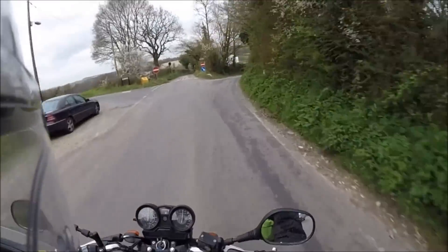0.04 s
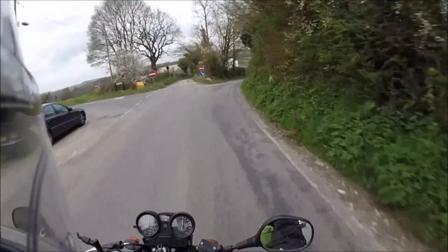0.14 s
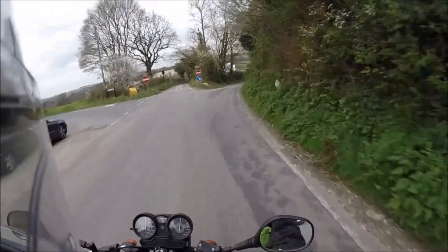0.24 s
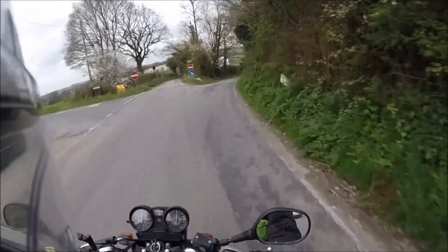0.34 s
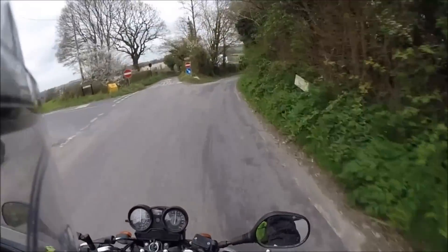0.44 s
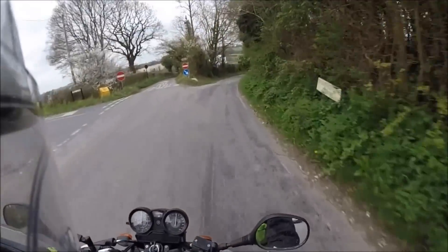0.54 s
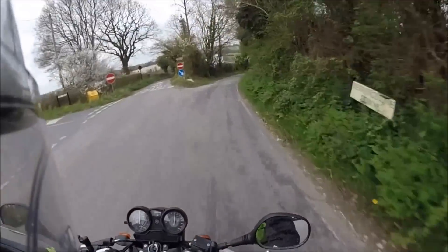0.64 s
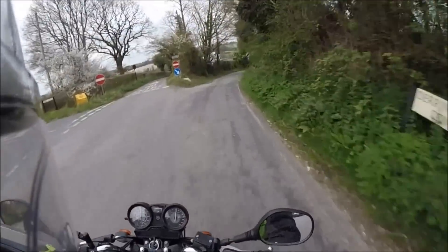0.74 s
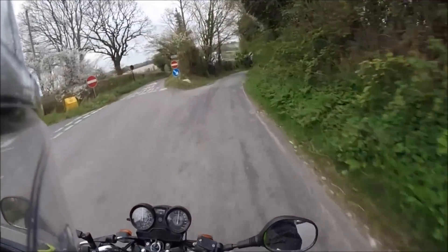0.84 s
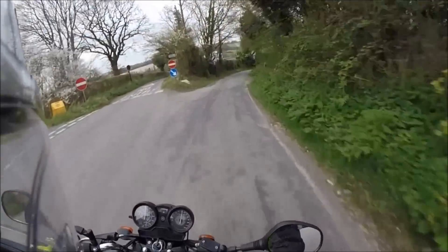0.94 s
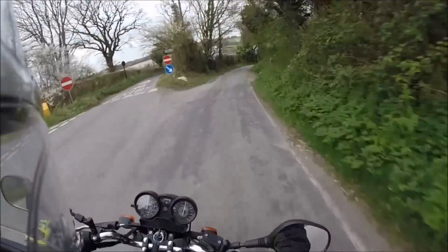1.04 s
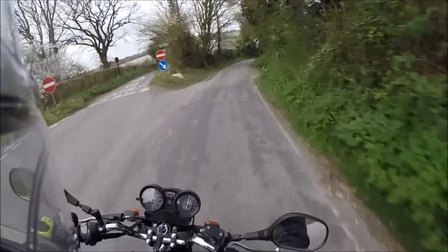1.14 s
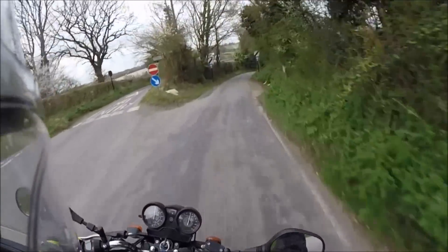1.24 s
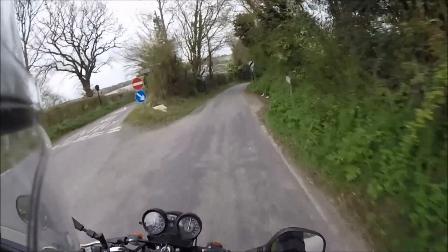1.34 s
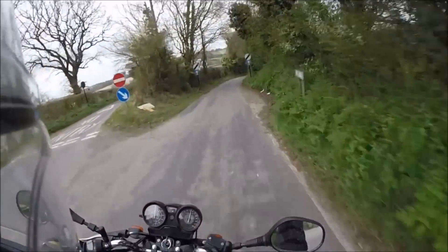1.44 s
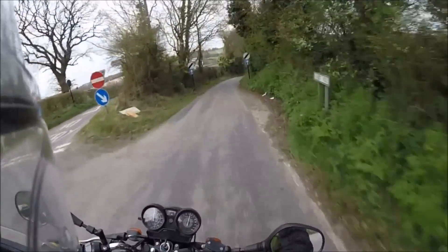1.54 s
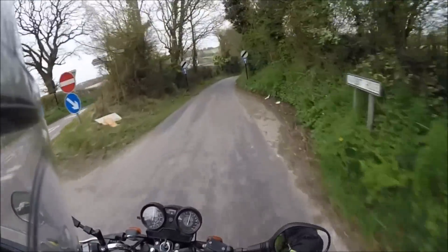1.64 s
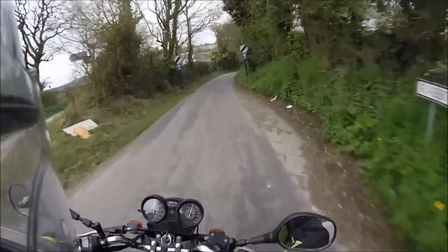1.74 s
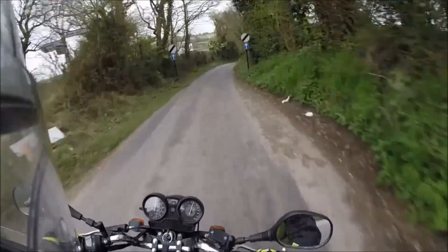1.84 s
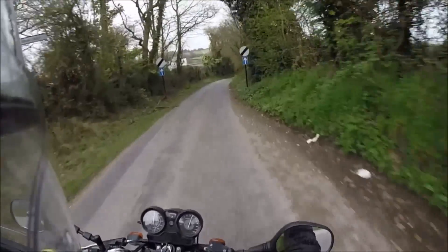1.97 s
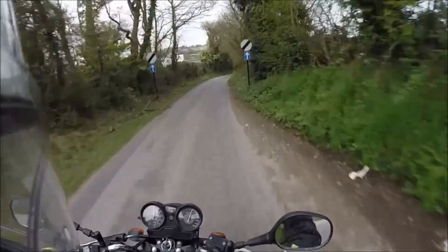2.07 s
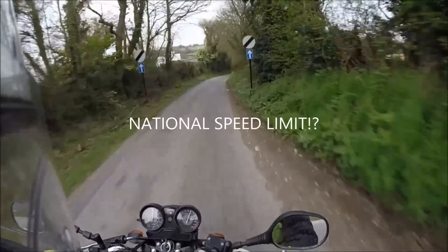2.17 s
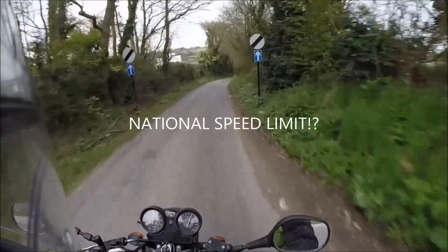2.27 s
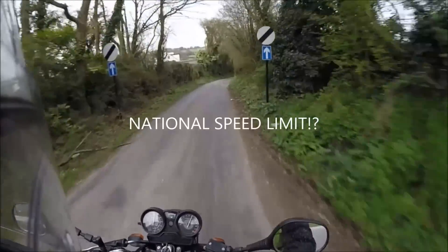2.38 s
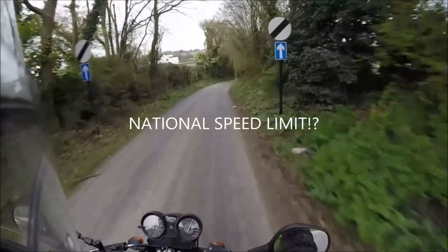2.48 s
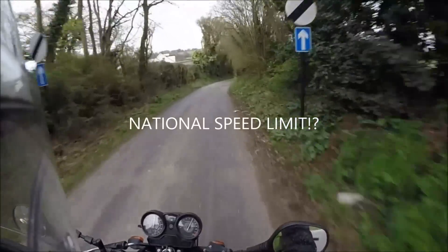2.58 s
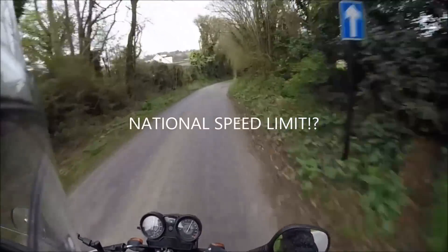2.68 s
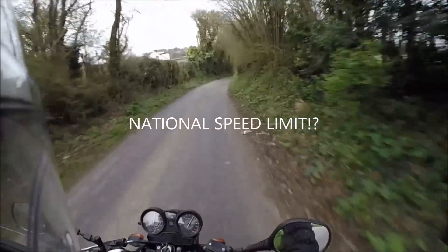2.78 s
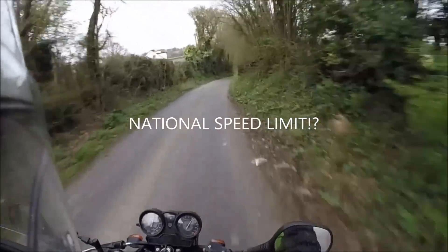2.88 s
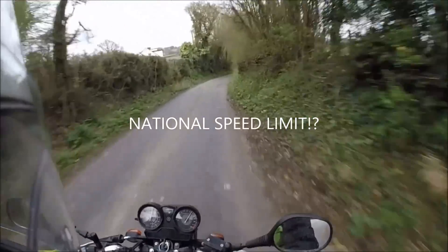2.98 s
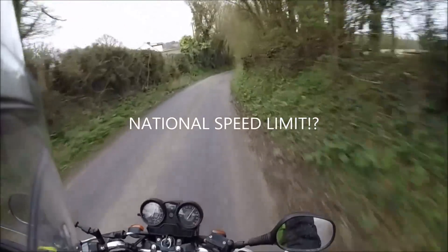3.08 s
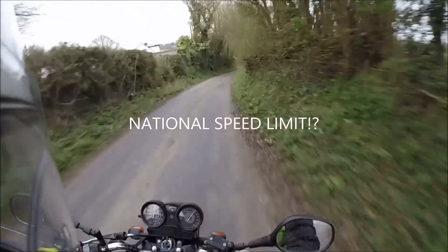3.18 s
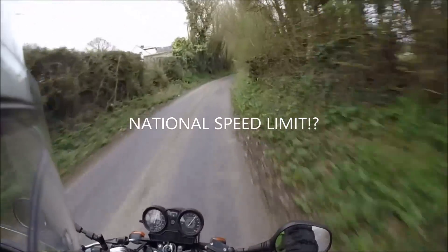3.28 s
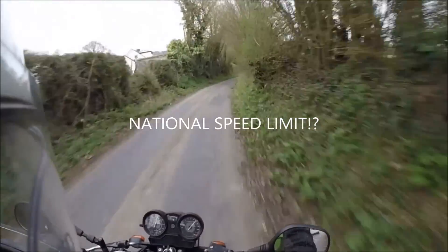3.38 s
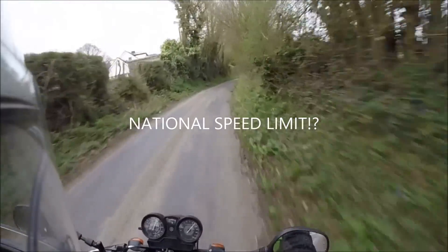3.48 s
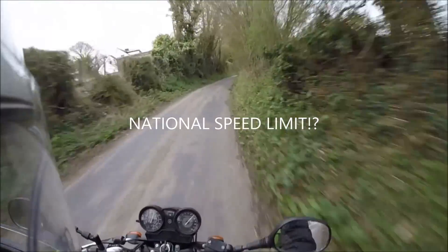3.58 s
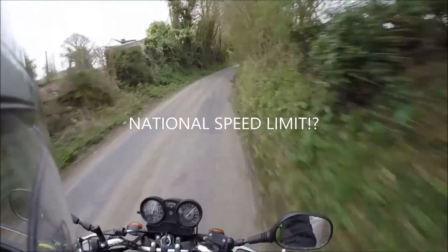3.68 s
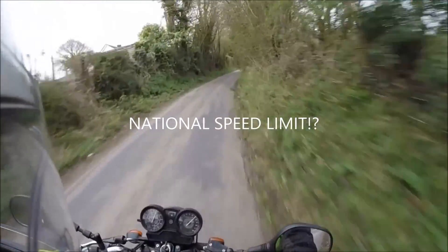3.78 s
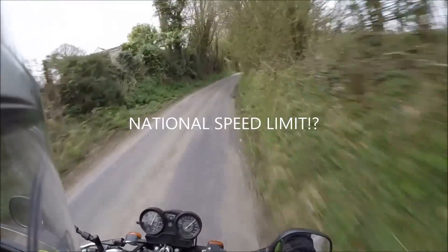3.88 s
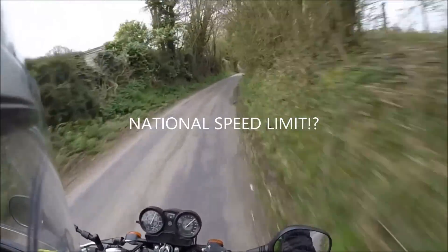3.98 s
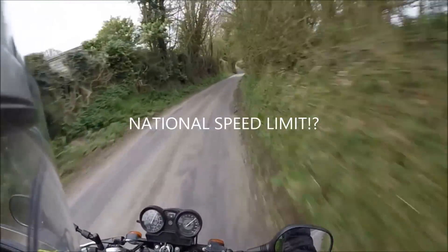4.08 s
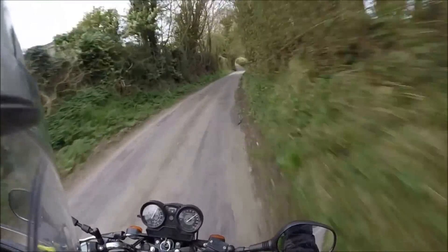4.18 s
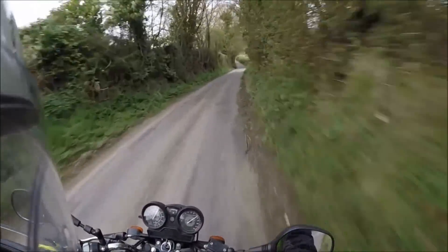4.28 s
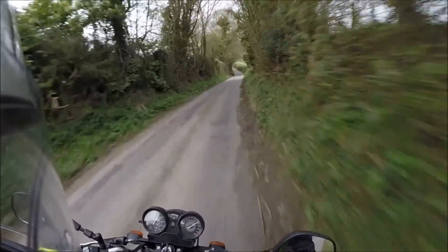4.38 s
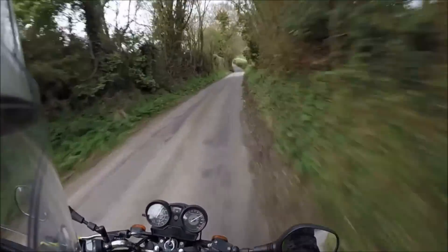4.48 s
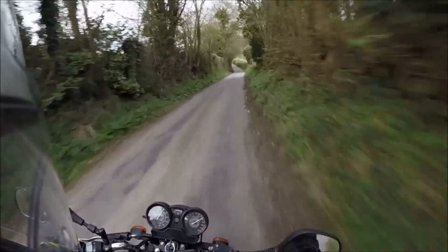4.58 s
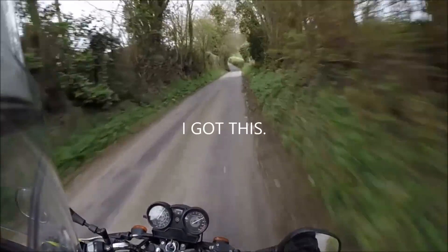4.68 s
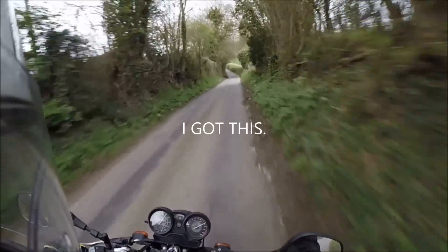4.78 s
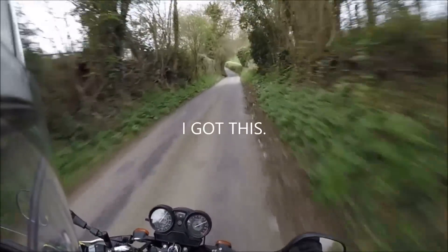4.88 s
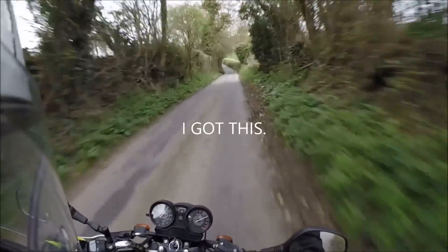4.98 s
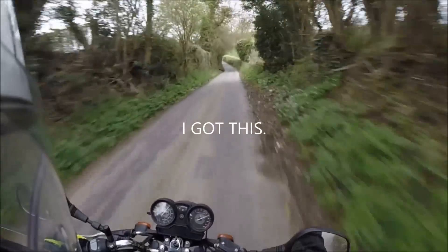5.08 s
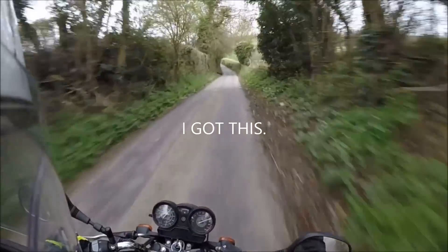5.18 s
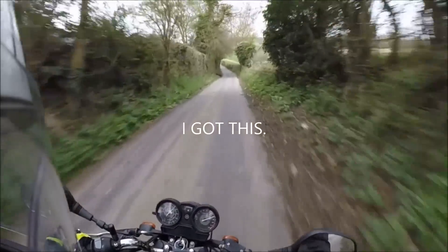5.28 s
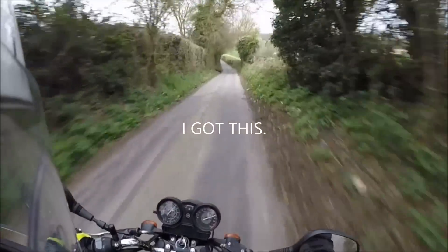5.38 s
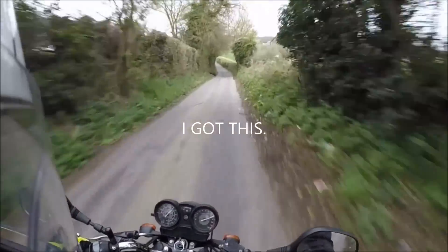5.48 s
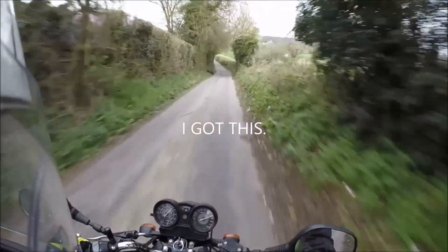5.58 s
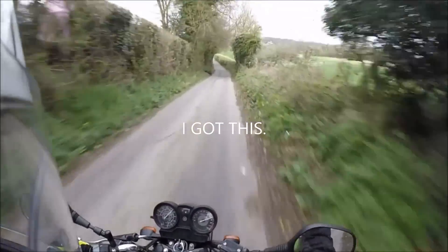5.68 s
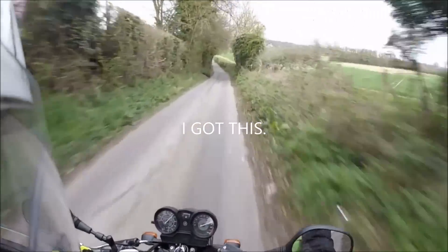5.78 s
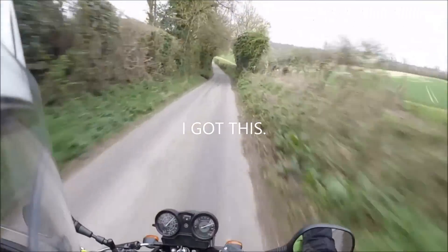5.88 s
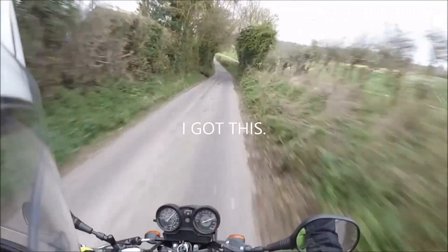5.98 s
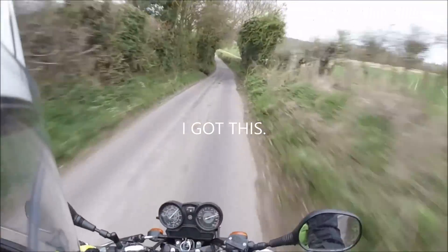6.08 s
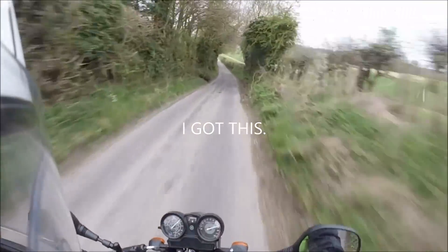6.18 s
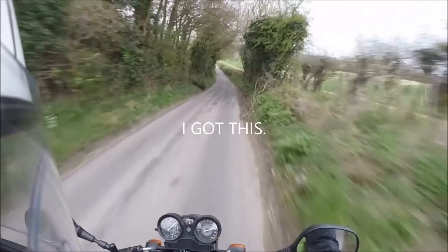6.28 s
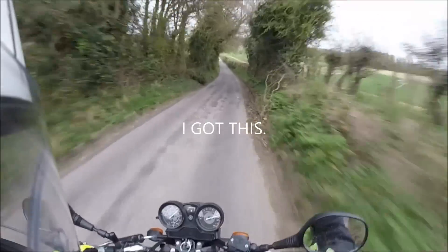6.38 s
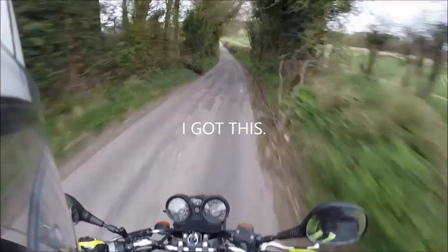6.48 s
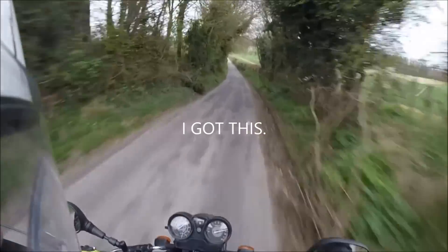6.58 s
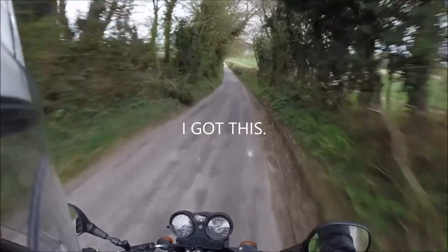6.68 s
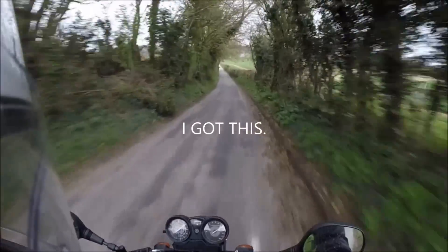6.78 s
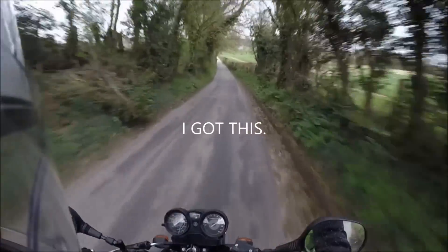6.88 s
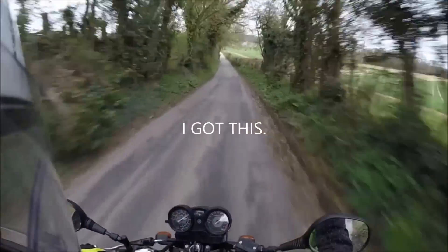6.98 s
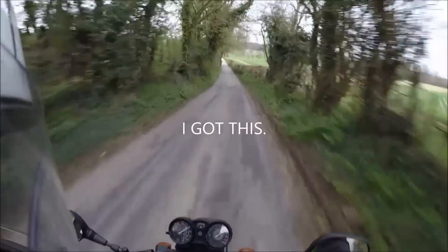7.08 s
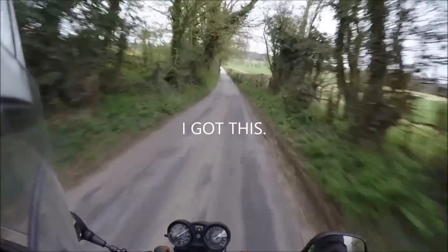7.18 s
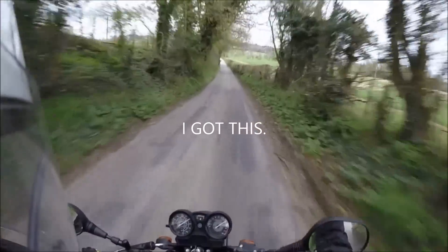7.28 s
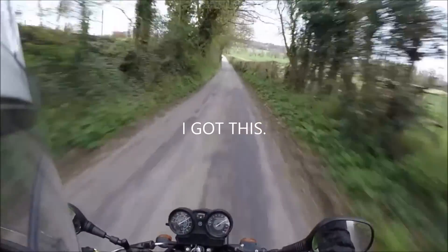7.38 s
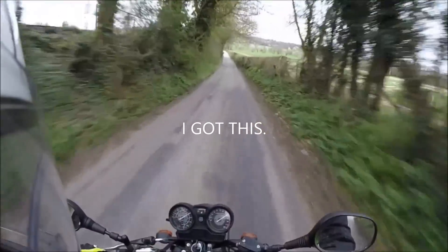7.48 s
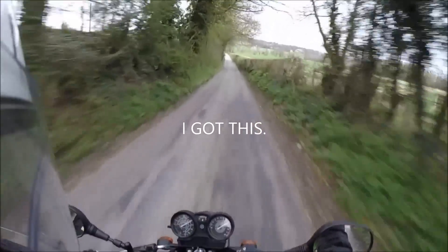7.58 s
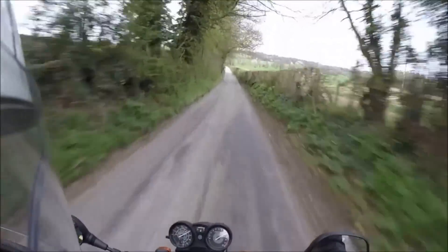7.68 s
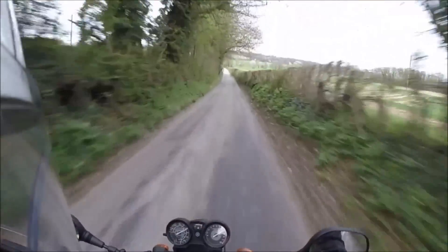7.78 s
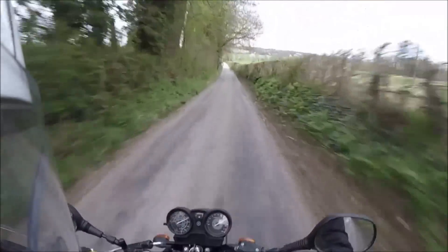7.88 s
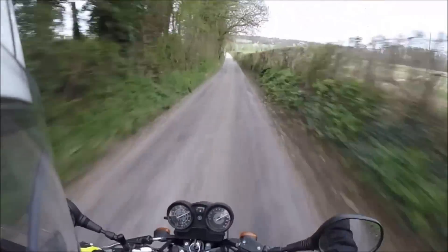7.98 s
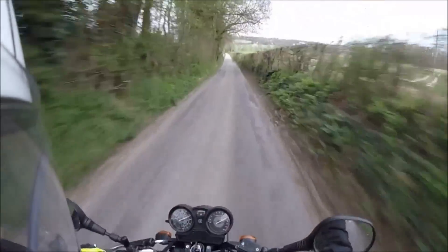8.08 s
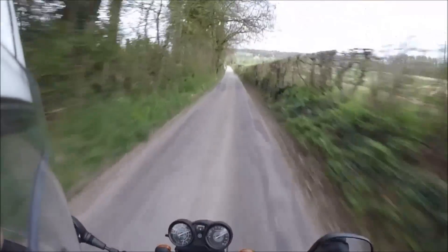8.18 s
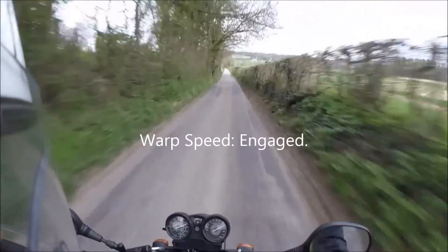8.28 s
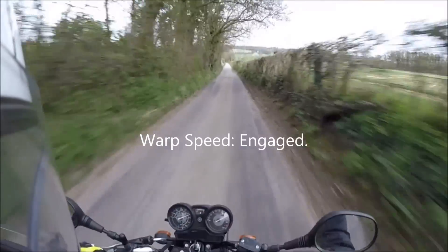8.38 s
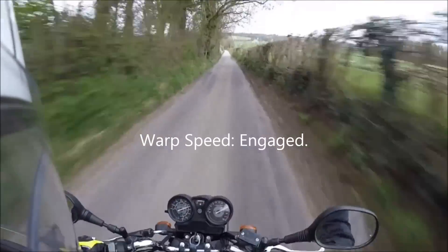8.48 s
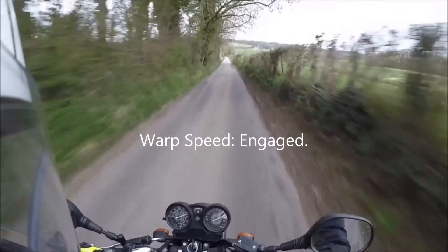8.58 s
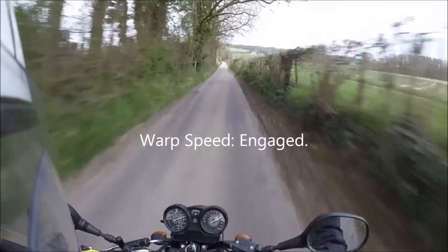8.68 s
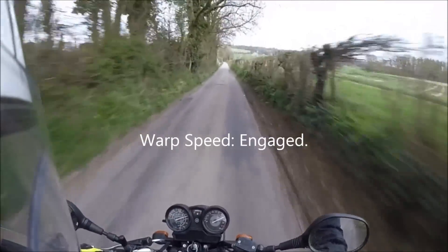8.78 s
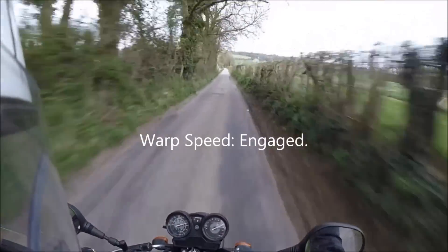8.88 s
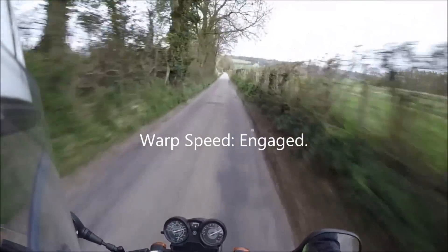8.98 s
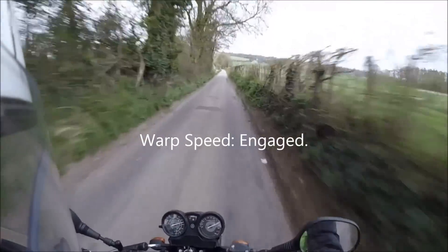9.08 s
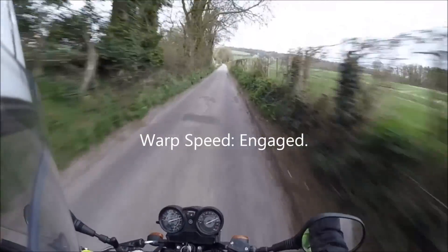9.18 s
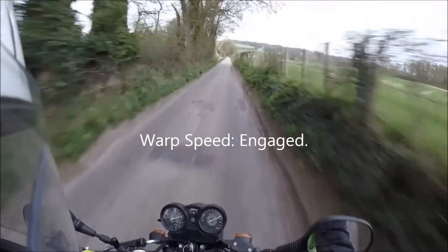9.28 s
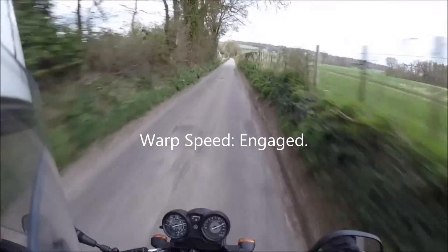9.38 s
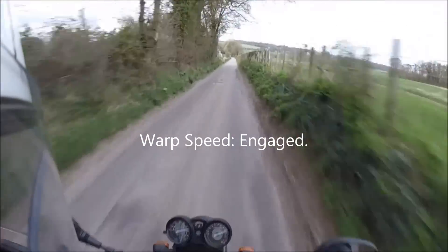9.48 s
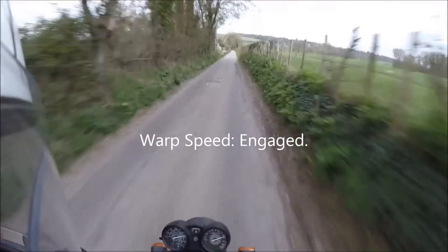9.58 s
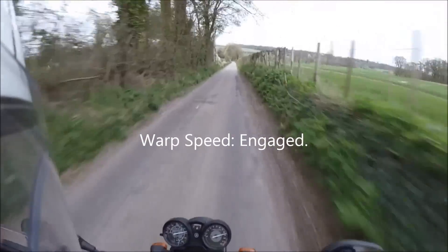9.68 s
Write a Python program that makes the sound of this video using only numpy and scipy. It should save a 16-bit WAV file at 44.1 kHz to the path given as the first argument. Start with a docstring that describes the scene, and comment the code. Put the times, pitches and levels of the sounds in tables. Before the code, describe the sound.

A helmet microphone on a motorcycle gathering speed along a country lane. Wind starts low, swells over the first two seconds, then holds as a dense, hollow midrange rush with low rumble and booming. A faint single-cylinder engine drones beneath, climbing smoothly in one gear. A tiny thin whistle passes, and later gusts add brighter hiss and heavier buffeting.

```python
"""A country lane, heard from a camera microphone on the helmet of a rider gathering speed on a single-cylinder motorcycle.
The airstream is shaped noise: it rings the cavities of the camera housing, rumbles and booms close around the helmet
and hisses over the edges, brighter as the speed rises. Gusts change the spray, rumble and boom; one thin whistle passes.
The engine, faint under the wind, is a stack of harmonics climbing slowly in one gear."""
import sys
import numpy as np
from scipy import signal
from scipy.fft import rfft, irfft, next_fast_len
from scipy.io import wavfile
from scipy.ndimage import uniform_filter1d

SR = 44100
rng = np.random.default_rng(int(sys.argv[2]) if len(sys.argv) > 2 else 0)


def materialize(psi):
    """Save the field psi as 16-bit PCM at rate SR to the path in sys.argv[1].

    A 1-D psi becomes a single channel; in a 2-D psi each row is a channel.
    """
    bounded = np.clip(np.atleast_2d(psi).T, -1, 1)
    quanta = np.round(bounded * 32767).astype(np.int16)
    wavfile.write(sys.argv[1], SR, quanta)


N = 429534
TIME = np.arange(N) / SR   # seconds
FREQS = np.maximum(np.arange(N // 2 + 1) * SR / N, 1)   # Hz

# Strength of the airstream at the helmet, before its sway. Each row: time in seconds, level in dB.
AIRSTREAM = [(0.0, -39), (0.05, -43.5), (0.43, -32.5), (0.84, -30), (1.0, -25), (1.16, -27), (1.54, -24.5),
             (2.06, -24), (2.25, -21), (5.07, -21), (5.24, -22), (6.78, -21), (7.24, -22), (7.35, -20.5),
             (8.24, -21.5), (8.71, -19.5), (9.0, -21), (9.74, -21)]
# Engine speed, and with it road speed. Each row: time in seconds, firings per second.
FIRING_RATE = [(0, 37), (1.2, 44), (1.7, 46.2), (2.3, 49.3), (2.7, 52.7), (3.1, 54.9), (3.5, 57.2),
               (4.0, 60.4), (4.5, 63), (5.0, 65.3), (5.8, 68.1), (6.4, 71.6), (8.0, 78.8), (9.74, 85)]
# Level of the exhaust note before its colour and roughness. Each row: time in seconds, level in dB.
EXHAUST_LEVEL = [(0, -78), (1.3, -58), (2.4, -45.5), (4.3, -45), (6.0, -48.5), (9.74, -49.5)]
# Gusts. Each row: centre in seconds, length in seconds, then the lift of spray, buffet and boom in dB.
GUSTS = [(0.55, 0.13, 0, 0, 11), (1.002, 0.62, -3, 1.5, 3), (2.15, .35, 0, -1, 5),
         (2.79, 0.14, 0.5, -0.5, 10), (4.554, .3, 1.5, 0, 3.5), (5.103, 0.58, -1.5, 0.5, 1),
         (5.953, .2, 1.5, 4, 8.5), (6.818, .2, 5, 2.5, -4), (7.215, 0.23, 5.5, 2, 6),
         (7.82, 0.31, 5.5, 3.5, 0), (8.303, 0.12, 4, 5.5, 2), (8.87, .14, 2, 0.5, 6),
         (9.105, 0.18, 5, 3, 11.5)]
# Short thin whistle. One row: centre in seconds, length in seconds, pitch in Hz, width in Hz.
WHISTLE = (3.56, .12, 6700, 300)

# Cavities of the camera housing. Each row: centre in Hz, half-power width in Hz, relative level in dB.
CAVITIES = [(1541, 194, -5.5), (1766, 186, 0.5), (1910, 71, -6), (2296, 190, -7.5), (2661, 189, -4.5),
            (2928, 120, -8), (3180, 157, -9), (3480, 220, -9), (3786, 180, -16.5)]
# Resonances of the edges. Each row: centre in Hz, half-power width in Hz, relative level in dB.
EDGE_MODES = [(4280, 530, 0.5), (5180, 650, -2), (5760, 540, -1), (6650, 440, -4.5), (7210, 440, -4.5)]
# The sharpest edge, which sings. Each row: centre in Hz, half-power width in Hz, relative level in dB.
EDGE_TONE = [(5446, 150, 0)]
# Fine spray of air above the hiss. Each row: centre in Hz, half-power width in Hz, relative level in dB.
SPRAY_MODES = [(7700, 1600, 0), (9060, 1200, -0.5), (10280, 630, 1.5), (11600, 600, -5.5), (12600, 540, -7),
               (13400, 600, -9), (14700, 1300, -16)]
# Colour of the soft middle of the wind. Each row: frequency in Hz, relative level in dB.
BREEZE_COLOUR = [(200, -40), (430, -4.5), (600, -1), (760, -2.5), (1050, 1), (1300, 0.5), (2000, -29),
                 (4000, -70)]
# Colour of the rumble on the helmet shell. Each row: frequency in Hz, relative level in dB.
BUFFET_COLOUR = [(8, -19), (27, 2.5), (40, 0.5), (66, -7), (105, -6.5), (175, 0), (250, -7.5), (335, -6.5),
                 (420, -15), (600, -17.5), (1300, -33), (3000, -80)]
# Exhaust resonance. Each row: frequency in Hz, gain in dB of a harmonic passing there.
EXHAUST_COLOUR = [(35, -12), (120, -12), (185, -7), (250, -15), (285, -11), (310, -3), (335, 0), (368, 0),
                  (388, -7), (410, -17), (470, -15), (520, -10), (560, -17), (620, -14), (1200, -24)]

CRUISE_FIRING_HZ, CRUISE_DB = 72, -21   # reference road speed and airstream level
HISS_GROWTH, SPRAY_GROWTH = 0.52, 1.2   # dB gained over the rush for each dB of road speed
HISS_FLUTTER_DB, SPRAY_FLUTTER_DB = 0.6, 1.2   # quick unevenness of the air over the edges
BOOM_HZ, BOOM_WIDTH_HZ = 51, 5.2
HUM_HZ, HUM_WIDTH_HZ, HUM_DB = 94, 22, -46   # low resonance of the bike
FULL_HARMONICS, HARMONIC_LOSS_DB = 7, 2.4   # harmonics above this one fade, by so many dB each
WHISTLE_DB = -46.5
CUTOFF_HZ = 15200


def from_db(db):
    """Decibels to gain."""
    return 10 ** (np.asarray(db) / 20)


def rms_one(x):
    """Scale to unit power."""
    return x / np.sqrt(np.mean(x ** 2) + 1e-20)


def in_time(rows):
    """The value of a two-column curve, sample by sample."""
    seconds, values = np.transpose(rows)
    return np.interp(TIME, seconds, values)


def bell(centre, length):
    """A smooth swell of height 1 around a moment, in seconds."""
    return np.exp(-(2 * (TIME - centre) / length) ** 2)


def colour(points, hz):
    """Gain at the given frequencies, drawn straight in dB over log frequency."""
    at, db = np.transpose(points)
    return from_db(np.interp(np.log(hz), np.log(at), db))


def resonances(modes):
    """Gain of steep-sided resonances whose powers add."""
    power = 0
    for hz, width, db in modes:
        detune = (FREQS / hz - hz / FREQS) * hz / width
        # half power where detune is 1
        power = power + from_db(db) ** 2 / (1 + (np.sqrt(2) - 1) * detune ** 2) ** 2
    return np.sqrt(power)


def noise(gain):
    """Turbulence of unit power with the given relative gain at each frequency."""
    size = next_fast_len(N, real=True)
    shape = np.interp(np.arange(size // 2 + 1) * SR / size, FREQS, gain)
    spectrum = rfft(rng.standard_normal(size)) * shape
    return rms_one(irfft(spectrum, size)[:N])


def eddies(rate_hz):
    """Random swings of spread 1, up to about the given rate."""
    return noise(1 / (1 + (FREQS / rate_hz) ** 2))


def housing_rush(air_db, flutter_db=0.58, trim_db=0.05, wall_hz=4100):
    """The airstream keeps the cavities ringing; each passing eddy changes how hard it pushes them."""
    wall = 1 / np.sqrt(1 + (FREQS / wall_hz) ** 20)   # the housing wall holds back the treble
    level_db = air_db + trim_db + flutter_db * eddies(rate_hz=97)
    return from_db(level_db) * noise(resonances(CAVITIES) * wall)


def edge_hiss(air_db, speed_db, gust_db, hiss_db=-22.5, spray_db=-34.0, tone_db=-26.0, hiss_gust_share=0.41):
    """Air tears off the edges and one sings; hiss and finer spray outgrow the rush with speed and follow gusts."""
    edge_db = air_db + HISS_GROWTH * speed_db + hiss_gust_share * gust_db
    flutter = eddies(rate_hz=27)
    hiss = from_db(edge_db + hiss_db + HISS_FLUTTER_DB * flutter) * noise(resonances(EDGE_MODES))
    tone = from_db(edge_db + tone_db) * noise(resonances(EDGE_TONE))
    fine_db = air_db + SPRAY_GROWTH * speed_db + gust_db + spray_db + SPRAY_FLUTTER_DB * flutter
    spray = from_db(fine_db) * noise(resonances(SPRAY_MODES))
    return hiss + tone + spray


def following(air_db, follow):
    """Airstream level whose distance in dB from cruise is scaled by follow."""
    return CRUISE_DB + follow * (air_db - CRUISE_DB)


def breeze(air_db, speed_db, breeze_db=-22.5, follow=0.89, growth=0.12, flutter_db=1.9):
    """The soft middle of the airstream, between rumble and cavities, fills in as speed rises."""
    level_db = following(air_db, follow) + growth * speed_db + breeze_db
    return from_db(level_db + flutter_db * eddies(rate_hz=25)) * noise(colour(BREEZE_COLOUR, FREQS))


def helmet_buffet(air_db, gust_db, buffet_db=-17, follow=0.95, lumpy_db=1.5):
    """Large eddies rumble unevenly on the shell."""
    level_db = following(air_db, follow) + buffet_db + gust_db
    return from_db(level_db + lumpy_db * eddies(rate_hz=18)) * noise(colour(BUFFET_COLOUR, FREQS))


def helmet_boom(air_db, gust_db, boom_db=-23.5, follow=0.73, steadiness=0.82):
    """The air around the helmet booms at one low pitch; partly self-sustained, it swells less than free noise."""
    boom = noise(resonances([(BOOM_HZ, BOOM_WIDTH_HZ, 0)]))
    swell = np.sqrt(np.abs(uniform_filter1d(boom ** 2, size=SR // 10)) + 1e-6)   # over 0.1 s
    steadied = rms_one(boom / swell ** steadiness)
    return from_db(following(air_db, follow) + boom_db + gust_db) * steadied


def gusts():
    """Each gust swells and passes smoothly; returns the summed lift in dB of spray, buffet and boom."""
    return sum(np.outer(lifts_db, bell(centre, length)) for centre, length, *lifts_db in GUSTS)


def engine(firing_hz, wobble=0.0016, rough_db=2.5, count=14):
    """Harmonics of the firing rate climb through the exhaust resonance; the second also hums in the bike."""
    uneven_hz = firing_hz * (1 + wobble * eddies(rate_hz=4.8))
    phase = 2 * np.pi * np.cumsum(uneven_hz) / SR
    exhaust = 0
    for k in range(1, count + 1):
        loss_db = HARMONIC_LOSS_DB * max(k - FULL_HARMONICS, 0)
        gain = colour(EXHAUST_COLOUR, k * firing_hz) * from_db(-loss_db)
        exhaust = exhaust + gain * np.sin(k * phase + rng.uniform(0, 2 * np.pi))
    level_db = in_time(EXHAUST_LEVEL) + rough_db * eddies(rate_hz=6.5)
    hum_gain = from_db(HUM_DB) * np.exp(-(2 * (2 * firing_hz - HUM_HZ) / HUM_WIDTH_HZ) ** 2)
    hum = hum_gain * np.sin(2 * phase)
    return np.sqrt(2) * (from_db(level_db) * exhaust + hum)   # root 2 gives a sine unit power


def whistle():
    """A narrow band of noise comes and goes in a moment as a thin whistle."""
    centre, length, hz, width = WHISTLE
    return from_db(WHISTLE_DB) * bell(centre, length) * noise(resonances([(hz, width, 0)]))


def scene(sway_db=0.7):
    """One swaying airstream on housing and helmet, over the engine."""
    air_db = in_time(AIRSTREAM) + sway_db * eddies(rate_hz=4)
    firing_hz = in_time(FIRING_RATE)
    speed_db = 20 * np.log10(firing_hz / CRUISE_FIRING_HZ)
    spray_db, buffet_db, boom_db = gusts()
    housing = housing_rush(air_db) + edge_hiss(air_db, speed_db, spray_db) + whistle()
    helmet = breeze(air_db, speed_db) + helmet_buffet(air_db, buffet_db) + helmet_boom(air_db, boom_db)
    return (housing + helmet + engine(firing_hz))[None]


def record(dry):
    """The ends are eased over 3 ms, then the top is cut steeply."""
    ease = np.clip(np.minimum(TIME, TIME[-1] - TIME) / 0.003, 0, 1)
    top_cut = signal.ellip(12, 0.1, 80, CUTOFF_HZ, fs=SR, output="sos")
    return signal.sosfilt(top_cut, dry * ease)


dry = scene()
out = record(dry)
materialize(out)
```